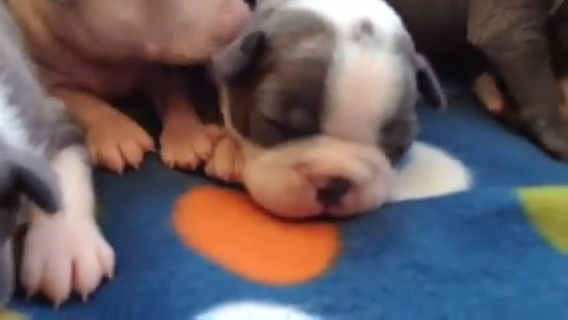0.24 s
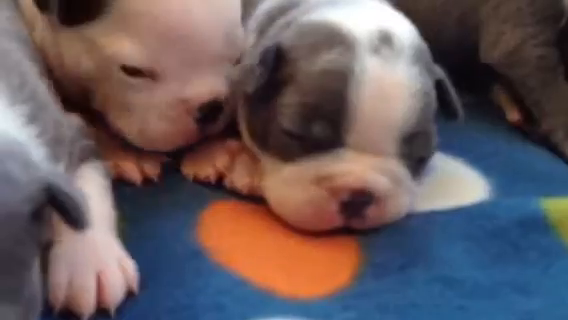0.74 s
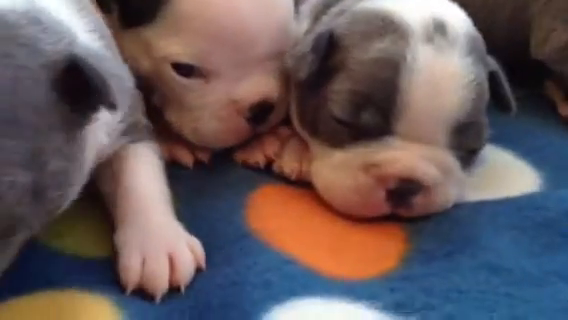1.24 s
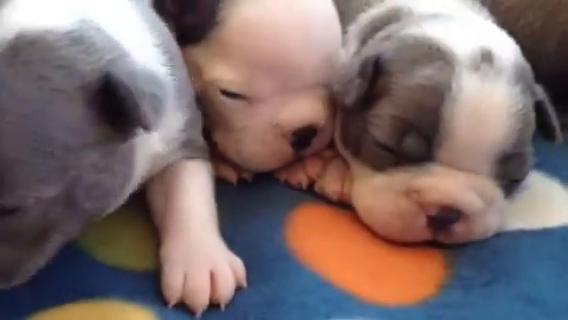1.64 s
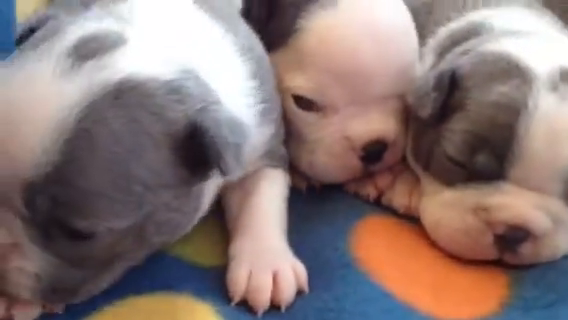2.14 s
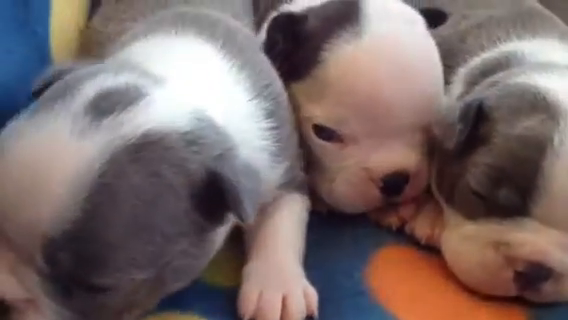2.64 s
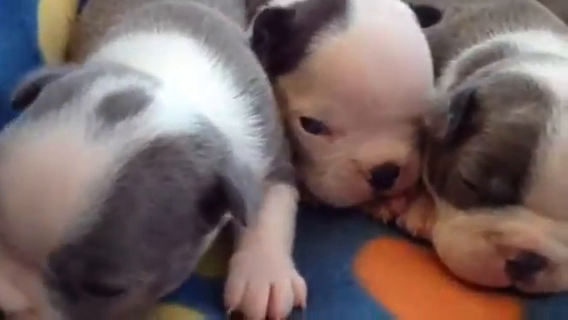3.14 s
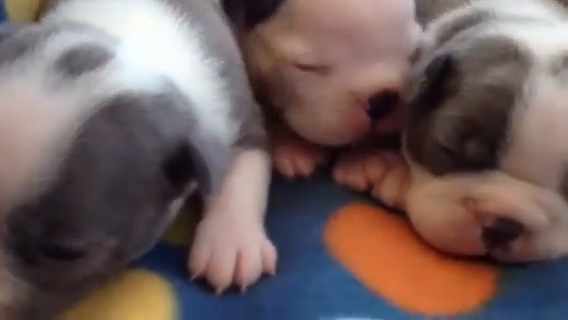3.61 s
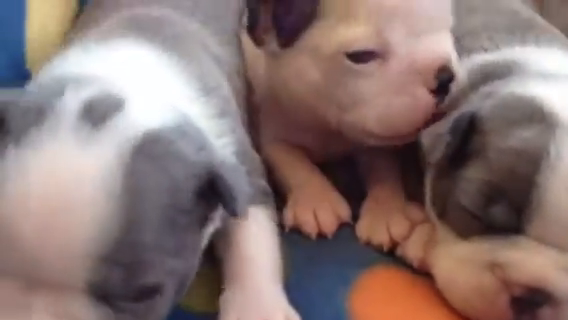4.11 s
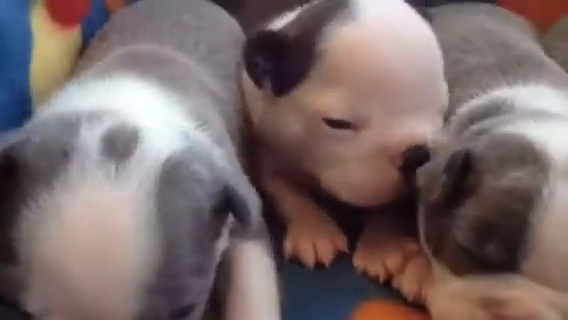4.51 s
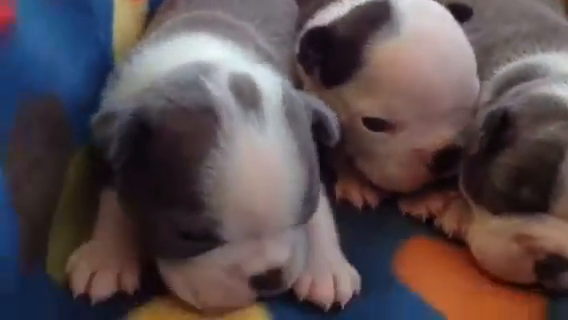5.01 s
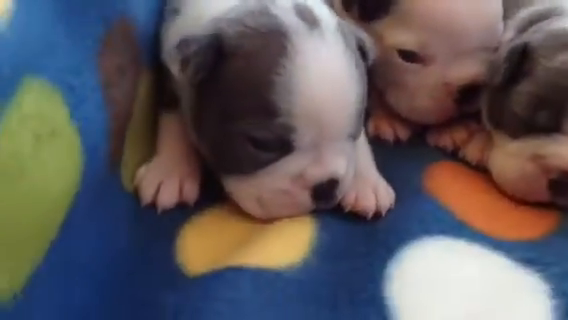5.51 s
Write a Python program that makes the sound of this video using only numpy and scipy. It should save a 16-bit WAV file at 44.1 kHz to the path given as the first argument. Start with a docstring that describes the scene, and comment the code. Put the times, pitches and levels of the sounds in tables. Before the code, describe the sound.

Quick high puppy whimpers, wavering and dropping in pitch, rise to a sharp squeal midway, above low muffled room noise.

```python
"""Dull room rumble and hiss, then a yip and a raspy grunt: a young puppy whimpers close to a small microphone.
It lies indoors on a blanket. Clear piping whines are sums of overtones; raspy cries are uneven fold pulses
ringing in the throat. Most end in a pitch drop; gasps of shaped noise follow many cries.
Short ticks (rings with a crack) come now and then, soft bumps come through the blanket (dying sines), and
faint nose whistles (gliding tones), a low undertone beneath a squeal and short wall reflections are added."""
import sys
import numpy as np
from scipy import signal
from scipy.fft import rfft, irfft, next_fast_len
from scipy.io import wavfile
from scipy.ndimage import uniform_filter1d

SR = 44100
rng = np.random.default_rng(int(sys.argv[2]) if len(sys.argv) > 2 else 0)


def to_wav(sig):
    """Store sig (one row per channel, or 1-D mono) as 16-bit WAV at the path in sys.argv[1].

    Samples outside -1..1 are clipped; the rate is SR.
    """
    pcm = np.clip(np.atleast_2d(sig), -1, 1) * 32767
    pcm = np.round(pcm).astype(np.int16)
    wavfile.write(sys.argv[1], SR, pcm.T)  # frames by channels


def makeup_ratio(level_db):
    """Linear amplitude ratio for a level in decibels (20 dB per factor of ten)."""
    decades = np.asarray(level_db, float) / 20
    return 10 ** decades


N = 254016


def evened(x):
    """Scales to rms 1."""
    return x / np.sqrt(np.mean(x ** 2) + 1e-20)


def read(points, hz):
    """Reads a spectrum on a log-frequency axis."""
    f, value = np.transpose(points)
    return np.interp(np.log(hz + 1), np.log(f + 1), value)


def add(mix, start_s, sound):
    """Mixes a sound in at start_s."""
    part = mix[round(start_s * SR):][:len(sound)]
    part += sound[:len(part)]


def colour(x, points):
    """Filters x by a spectrum."""
    size = next_fast_len(len(x) + 1024)
    gain = makeup_ratio(read(points, np.fft.rfftfreq(size, 1 / SR)))
    return irfft(rfft(x, size) * gain, size)[:len(x)]


def resonate(x, hz, width_hz):
    """Moving resonance: shifts the curve hz down to zero, smooths, and shifts back."""
    turn = np.exp(2j * np.pi * np.cumsum(hz) / SR)
    r = np.exp(-np.pi * width_hz / SR)
    return 2 * (turn * signal.lfilter([1 - r], [1, -r], x / turn)).real


# Spectral shape of the room noise. Each row: frequency in Hz, relative level in dB.
ROOM_COLOUR = [(24, -38), (40, -35), (91, -23.5), (170, 0.5), (325, -4.5), (359, -8.5), (496, -2.5),
               (817, -21), (948, -9.5), (1220, -21), (1310, -20), (1730, -23), (15500, -35.5)]


def room(level_db=-56.5, patchy_db=1.8):
    """Steady rumble and hiss: shaped noise whose spectrum drifts slightly in patches."""
    frames, hz = N // 512 + 5, np.fft.rfftfreq(2048, 1 / SR)
    a, b, patches = rng.standard_normal((frames, 1025, 3)).T
    patches = uniform_filter1d(patches, size=20, axis=0)
    patches = evened(uniform_filter1d(patches, size=8, axis=1))
    z = (a + 1j * b) * makeup_ratio(read(ROOM_COLOUR, hz)[:, None] + patchy_db * patches)
    noise = signal.istft(z, nperseg=2048, noverlap=1536)[1][:N]
    return makeup_ratio(level_db) * evened(noise)


# Throat and mouth acting on the low overtones. Each row: frequency in Hz, gain in dB.
THROAT = [(700, -8), (1130, -17.5), (1970, -3.5), (2760, -5.5), (3050, -21.5), (3700, -35.5), (4200, -43),
          (6500, -47), (8000, -40)]
# Bright band of the small microphone, for high overtones and breath. Each row: frequency in Hz,
# relative gain in dB.
BRIGHT = [(4000, -59), (5800, -26), (7000, -11), (9100, -2.5), (10500, 8), (12100, -1.5), (13100, -11),
          (15500, -4)]
# Colour of the rasp. Each row: frequency in Hz, relative gain in dB.
RASP_COLOUR = [(150, -54), (550, -16), (900, -2.5), (1400, -5), (2000, -6), (2600, -9), (2900, -14.5),
               (3300, -38), (5700, -60)]
SLIP, SLIP_FROM_OCTAVES_PER_S, START_S, SETTLE_S = .02, 19, .012, .02
EARLY_CYCLES, UNEVEN, HALVES, SWAPS_PER_S = .09, .36, .8, 70
WAVER, RASP_WAVER, RASP_FLUTTER_DB = .053, .9, 2.5
OPEN_HZ, TOP_HZ = 3450, 15350
BREATH_DB, THROAT_RING_DB, TILT_DB_PER_OVERTONE = -8, -6, 3


def cry(rows, shrill_db, start_rasp=0, pattern=2, open_db=0, rise_s=.005, fall_s=.006, edge_db=-28):
    """Steady folds give clean overtones; irregular folds give uneven pulses in the throat."""
    # Each row: time in seconds, pitch in Hz, effort in dB, overtone lift in dB, rasp from 0 to 1.
    first, last = np.array(rows[0], float), np.array(rows[-1], float)
    rows = [first + (-rise_s, 0, edge_db, 0, 0), *rows, last + (fall_s, 0, edge_db, 0, 0)]
    s, *columns = np.transpose(rows)
    t = np.arange(s[0], s[-1], 1 / SR)
    hz, effort_db, pressed_db, rasp = (uniform_filter1d(np.interp(t, s, c), size=130) for c in columns)
    hz = uniform_filter1d(hz, size=220)
    chance = rng.standard_normal((4, len(t)))

    # folds beat unevenly at the start and while the settled pitch jumps
    jump_octaves_per_s = uniform_filter1d(abs(np.gradient(np.log2(hz))) * SR, size=200)
    jump_octaves_per_s = jump_octaves_per_s * (t > first[0] + SETTLE_S)
    slip = SLIP * np.maximum(jump_octaves_per_s - SLIP_FROM_OCTAVES_PER_S, 0)
    rough = np.clip(rasp + slip + start_rasp * np.exp(-abs(t - first[0]) / START_S), 0, .9)
    clean = np.sqrt(1 - rough)
    waver = (WAVER + RASP_WAVER * rasp) * uniform_filter1d(chance[0], size=200)
    turns = np.cumsum(hz * (1 + waver)) / SR

    order = np.arange(2, 20)[:, None]
    overtone_hz = order * hz
    waves = np.cos(2 * np.pi * order * turns + order ** 2) * (overtone_hz < TOP_HZ)
    overtone_db = pressed_db - TILT_DB_PER_OVERTONE * (order - 2) + read(THROAT, overtone_hz)
    overtone_db = overtone_db + open_db * (overtone_hz > OPEN_HZ)
    low = np.cos(2 * np.pi * turns) + (clean * makeup_ratio(overtone_db) * waves).sum(0)
    high = evened((makeup_ratio(read(BRIGHT, overtone_hz)) * waves).sum(0))

    # each irregular cycle has its own strength and comes early or late; strong and weak ones
    # repeat in a short pattern that now and then skips a step
    early = EARLY_CYCLES * evened(uniform_filter1d(chance[1], size=90))
    beat = np.maximum.accumulate(np.floor(turns + early))
    swaps = np.cumsum(np.exp(-np.sum(chance[2:] ** 2, axis=0) / 2) < SWAPS_PER_S / SR)
    step = (beat + swaps) / pattern % 1
    strength = 1 + HALVES * evened(step.mean() - step) + UNEVEN * chance[3]
    pulses = np.diff(beat, prepend=beat[0]) * strength
    pulses -= uniform_filter1d(pulses, size=200)
    throat_ring = evened(resonate(resonate(pulses, hz, 510), hz, 900))
    raspy = evened(evened(colour(pulses, RASP_COLOUR)) + makeup_ratio(THROAT_RING_DB) * throat_ring)

    air = evened(colour(chance[2], BRIGHT))
    treble = clean * high + (np.sqrt(rough) + makeup_ratio(BREATH_DB)) * air
    voice = np.sqrt(2) * clean * low + np.sqrt(rough) * raspy + makeup_ratio(shrill_db) * treble
    flutter = evened(uniform_filter1d(uniform_filter1d(chance[3], size=150), size=150))
    return s[0], -makeup_ratio(effort_db + RASP_FLUTTER_DB * rasp * flutter) * voice


# Yips just before a cry. Each row: start in seconds, length in seconds, pitch in Hz, final effort in dB,
# treble against the effort in dB.
YIPS = [(0.051, 0.004, 1286, -39.5, -22), (1.397, 0.0077, 1388, -40, -50), (1.864, 0.019, 1143, -40, -55),
        (2.994, 0.01, 1197, -47.5, -45), (4.428, 0.0023, 1446, -39, -26), (4.834, 0.0023, 1200, -41.5, -35)]
YIP_LIFT_DB, YIP_RASP = -1, .55


def yip(s, length_s, hz, db, shrill_db):
    """A false start of the voice: effort and rasp rise at one pitch."""
    start = (s, hz, db - 7, YIP_LIFT_DB, YIP_RASP / 2)
    end = (s + length_s, hz, db, YIP_LIFT_DB, YIP_RASP)
    return cry([start, end], shrill_db)


def walls(x, level_db=-31, t60_s=0.12):
    """A short soft tail of sparse reflections with random signs."""
    taps = np.zeros(SR // 4)
    at = np.arange(100, len(taps) - 20, 20) + rng.integers(0, 20, (len(taps) - 101) // 20)
    taps[at] = rng.choice([-1., 1.], len(at)) * makeup_ratio(-60 * at / SR / t60_s)
    return makeup_ratio(level_db) * signal.fftconvolve(x, taps / np.linalg.norm(taps))[:N]


# Raspy grunts. Each row: start in seconds, length in seconds, start pitch in Hz, end pitch in Hz,
# catch pitch in Hz, effort in dB, last catch against the effort in dB, throb depth in dB.
GRUNTS = [(0.072, 0.036, 1154, 986, 848, -42, 8, 3.5), (0.417, 0.042, 1480, 1091, 885, -37, 3, -4),
          (2.245, 0.063, 1098, 806, 833, -43.5, 5.5, 3), (2.592, .054, 1053, 992, 934, -52.5, -1.5, 9),
          (3.006, 0.061, 1073, 1045, 920, -43, -9, 0.5)]
# Each value, one a grunt: fold cycles in one strong-weak pattern.
GRUNT_PATTERN = [3, 2, 2, 2.5, 4.5]
SAG_BEND, THROB_HZ, GRUNT_RASP, GRUNT_CATCH_S = .8, 81.7, .73, .008
GRUNT_LIFT_DB, STALL_DB = -3, -6
TREBLE_AT_1_KHZ_DB, TREBLE_DB_PER_OCTAVE = -38, 32  # higher grunts are brighter
# shared with the whines: overtone and effort changes at the catch
BREAK_DULL_DB, CATCH_DULL_DB, CATCH_FADE_DB = -1, -9.5, -5


def grunt(s, length_s, start_hz, end_hz, catch_hz, db, catch_db, throb_db, pattern):
    """A clear start turns to rasp that sags, throbs and stalls, then a dull catch; a weak catch trails off."""
    end = s + length_s
    rows = [(s + (length_s - GRUNT_CATCH_S) * u, start_hz + (end_hz - start_hz) * u ** SAG_BEND,
             db, GRUNT_LIFT_DB, GRUNT_RASP * (u > 0))
            for u in np.linspace(0, 1, num=9)]
    rows += [(end - GRUNT_CATCH_S / 2, end_hz, db + STALL_DB, GRUNT_LIFT_DB, GRUNT_RASP),
             (end + 0.0022, catch_hz, db + catch_db, GRUNT_LIFT_DB + BREAK_DULL_DB, YIP_RASP / 2),
             (end + GRUNT_CATCH_S, catch_hz, db + catch_db + CATCH_FADE_DB,
              GRUNT_LIFT_DB + CATCH_DULL_DB, 0)]
    shrill_db = TREBLE_AT_1_KHZ_DB + TREBLE_DB_PER_OCTAVE * np.log2(start_hz / 1000)
    fall_s = .018 if catch_db < 0 else .006
    start, voice = cry(rows, shrill_db, pattern=pattern, fall_s=fall_s)
    t = np.arange(len(voice)) / SR + start - s
    throb = 1.22 - np.sin(np.pi * THROB_HZ * (t + 0.002) + np.pi / 2) ** 4
    return start, voice * makeup_ratio(throb_db * throb)


# Gasps after the cries. Each row: start in seconds, length in seconds, rms level before edge fades in dB.
GASPS = [(0.105, 0.078, -56.5), (0.467, 0.036, -58.5), (0.872, 0.036, -60), (1.238, 0.025, -60),
         (1.648, 0.042, -57), (2.011, 0.032, -58.5), (2.303, 0.061, -62.5), (3.654, 0.034, -64),
         (4.266, 0.031, -61), (4.675, 0.03, -59.5), (5.087, 0.026, -57.5), (5.453, 0.071, -62)]
# Each row: frequency in Hz, relative gain in dB.
GASP_COLOUR = [(800, 9.5), (2000, 11.5), (4500, 6.5), (6000, -1), (10500, 6.5), (15000, 5.5)]


def gasp(length_s):
    """A puff of air: coloured noise with faded edges."""
    count = round(length_s * SR)
    return evened(colour(rng.standard_normal(count), GASP_COLOUR)) * signal.windows.tukey(count, .6)


# Short ticks of lips and claws; the final row is the sharp onset of the last cry's catch.
# Each row: start in seconds, ring level in dB, ring frequency in Hz.
TICKS = [(0.229, -42.5, 900), (1.022, -52.5, 1560), (2.017, -45, 1010), (2.422, -43.5, 1070),
         (3.438, -43.5, 1730), (3.978, -35.5, 4150), (4.801, -38.5, 896), (5.448, -32, 1350)]


def tick(hz, cycles=25, crack=0.75):
    """A sharp noise crack with a very short ring that falls 60 dB in the given cycles."""
    t = np.arange(800) / SR
    ring = np.sin(2 * np.pi * hz * t) * makeup_ratio(-60 * t * hz / cycles)
    noise = uniform_filter1d(rng.standard_normal(len(t)), size=13)
    return ring + crack * noise * makeup_ratio(-60 * t / 0.043)


# One curve a stretch of voice; the yelp and the last raspy cry take two each.
# Each row: time in seconds, pitch in Hz, effort in dB.
WHINES = [
    [(0.722, 1795, -33.5), (0.729, 1530, -38), (.744, 1368, -37), (0.76, 1312, -36.5), (0.802, 1422, -34),
     (0.826, 1326, -32), (0.857, 1340, -36.5)],
    [(1.072, 1880, -35.5), (1.101, 2141, -36.5), (1.106, 1842, -33.5), (1.121, 1862, -34),
     (1.141, 1744, -33.5), (1.177, 1614, -39.5), (1.189, 1566, -34), (1.215, 1439, -38.5)],
    [(1.428, 1494, -40.5), (1.462, 1422, -40.5), (1.486, 1346, -40), (1.504, 1190, -49), (1.518, 1157, -38),
     (1.54, 1110, -38), (1.566, 1134, -39), (1.61, 1051, -36.5), (1.634, 1018, -37.5)],
    [(1.886, 1090, -37), (1.898, 1021, -38), (1.91, 999, -35.5), (1.944, 1083, -39.5), (1.974, 963, -32.5),
     (1.993, 900, -34.5)],
    [(3.52, 2000, -57), (3.526, 1587, -50.5), (3.561, 1520, -52), (3.595, 1271, -49.5),
     (3.621, 1090, -50.5), (3.633, 936, -48.5), (3.645, 760, -49)],
    [(3.824, 2720, -45), (3.828, 2780, -23), (3.833, 2404, -38.5), (3.842, 2250, -26), (3.856, 2113, -30),
     (3.862, 1918, -23), (3.878, 2095, -27.5), (3.897, 2094, -28.5), (3.911, 1846, -22.5)],
    [(3.918, 1430, -40), (3.932, 1435, -41.5), (3.96, 1570, -36), (3.972, 1607, -49.5),
     (4.012, 1564, -63.5)],
    [(4.112, 2510, -43), (4.123, 2110, -34), (4.151, 2247, -32), (4.173, 2025, -29), (4.191, 1830, -30),
     (4.207, 1830, -28), (4.235, 1829, -30.5), (4.246, 1730, -34.5), (4.257, 1512, -27),
     (4.264, 1420, -39.5)],
    [(4.441, 1588, -41.5), (4.469, 1798, -42), (4.489, 1854, -37), (4.511, 1868, -35.5),
     (4.563, 1670, -40.5), (4.591, 1585, -37.5), (4.625, 1567, -38), (4.641, 1492, -36.5),
     (4.657, 1302, -35), (4.664, 1307, -30.5)],
    [(4.861, 1317, -42), (4.891, 1368, -43), (4.911, 1291, -41), (4.947, 1188, -34.5), (5.021, 1104, -35),
     (5.047, 1031, -37), (5.068, 1031, -36.5)],
    [(5.304, 1152, -44), (5.323, 1056, -46), (5.395, 1125, -44), (5.411, 957, -44)],
    [(5.42, 916, -45), (5.43, 888, -42.5), (5.443, 822, -52)],
]
# Each row, one a curve: overtone lift in dB, treble against the effort in dB, pitch drop at the break
# from 0 to 1, share of the drop won back, catch against the effort in dB.
WHINE_VOICES = [(2, -16, .19, 0.07, 7), (3.5, -21, 0.22, 0.2, 4.5), (0.5, -26.5, .19, 0.8, 5.5),
                (-5, -38, 0.2, 1, -2), (10.5, -33, 0.2, 0.2, 3), (2.5, -19, 0.01, 0, 0),
                (15.5, -18.5, 0.03, 0, 0), (-2, -18, 0.03, 0, 0), (-2, -16.5, 0.06, 0.83, -7.5),
                (-4.5, -25, .21, 0.9, 1), (-2, -32, 0.03, 0, 0), (2.5, -38, .15, 1.5, 13.5)]
# Share of irregular fold cycles. Each row, one a curve: at the start, in the glide, at the break, all 0 to 1.
WHINE_RASP = [(.03, 0, .1), (0, 0, .1), (.5, .004, .1), (.4, .002, .1), (.4, .01, .65), (0, .002, 0),
              (.3, .03, 0), (.05, .001, 0), (.1, 0, .05), (.25, .002, .1), (0, .7, 0), (.5, .15, .2)]
# Open mouth. Each value, one a curve: lift of the low overtones above OPEN_HZ in dB.
WHINE_OPEN = [-1, -4, 1, -3, 14, -3, 1, 3.5, 6.5, 2, 2, 8]
# share of a dip in effort that the overtones do not follow; deeper dips take them along
OVERTONE_HOLD, HOLD_LIMIT_DB = .5, 8
BREAK_S, CATCH_S, NO_BREAK_DROP = .008, .0099, .02


def whine(curve, rasp, open_db, lift_db, shrill_db, drop, regain, catch_db):
    """A glide of the voice; where the drop is large, it ends in a pitch fall and a dulling catch."""
    start_rasp, glide_rasp, break_rasp = rasp
    top_db = max(db for _, _, db in curve)
    rows = [(s, hz, db, lift_db + OVERTONE_HOLD * min(top_db - db, HOLD_LIMIT_DB), glide_rasp)
            for s, hz, db in curve]
    s, hz, db = curve[-1]
    if drop > NO_BREAK_DROP:
        break_end = s + BREAK_S
        rows += [(break_end, hz * (1 - drop), db + catch_db, lift_db + BREAK_DULL_DB, break_rasp),
                 (break_end + CATCH_S, hz * (1 - drop * (1 - regain)), db + catch_db + CATCH_FADE_DB,
                  lift_db + CATCH_DULL_DB, break_rasp / 2)]
    return cry(rows, shrill_db, start_rasp, open_db=open_db)


# Faint nose whistles. Each row: start in seconds, length in seconds, start pitch in Hz, top pitch in Hz,
# end pitch in Hz, peak level in dB.
WHISTLES = [(0.937, 0.05, 9160, 9530, 9370, -64), (4.723, 0.077, 10700, 11100, 9640, -67)]


def whistle(length_s, *arch_hz):
    """Air through a narrow nostril: one thin arching tone."""
    count = round(length_s * SR)
    hz = np.interp(np.linspace(0, 2, count), np.arange(3), arch_hz)
    hz = uniform_filter1d(hz, size=400)
    return np.sin(2 * np.pi * np.cumsum(hz) / SR) * signal.windows.tukey(count, .5)


# Undertone of the squeal. Each row: time in seconds, pitch in Hz, rms level of its fundamental in dB.
UNDERTONE = [(3.865, 542, -50.5), (3.927, 615, -60.5), (3.972, 507, -49)]


def undertone():
    """A faint low undertone beneath the squeal: a wavering tone with two weaker overtones."""
    s, hz, db = np.transpose(UNDERTONE)
    t = np.arange(s[0], s[-1], 1 / SR)
    waver = 0.25 * uniform_filter1d(rng.standard_normal(len(t)), size=100)
    phase = 2 * np.pi * np.cumsum(np.interp(t, s, hz) * (1 + waver)) / SR
    voice = np.cos(phase) + 0.43 * np.cos(2 * phase) + 0.33 * np.cos(3 * phase)
    return s[0], np.sqrt(2) * makeup_ratio(np.interp(t, s, db)) * voice * signal.windows.tukey(len(t), .2)


# Soft bumps through the blanket. Each row: start in seconds, level before decay in dB, frequency in Hz.
BUMPS = [(4.078, -36, 155), (4.804, -29, 334)]


def bump(hz, cycles=5.8):
    """A padded push: a sine that dies within a few cycles."""
    turns = np.arange(4000) / SR * hz
    return np.sin(2 * np.pi * turns) * makeup_ratio(-60 * turns / cycles) * np.minimum(2 * turns, 1)


def scene():
    """The puppy's voice and small sounds, with wall reflections, over the room noise."""
    puppy = np.zeros(N)
    for row in YIPS:
        add(puppy, *yip(*row))
    for row, pattern in zip(GRUNTS, GRUNT_PATTERN):
        add(puppy, *grunt(*row, pattern))
    for s, length_s, db in GASPS:
        add(puppy, s, makeup_ratio(db) * gasp(length_s))
    for s, db, hz in TICKS:
        add(puppy, s, makeup_ratio(db) * tick(hz))
    for curve, rasp, open_db, voice in zip(WHINES, WHINE_RASP, WHINE_OPEN, WHINE_VOICES):
        add(puppy, *whine(curve, rasp, open_db, *voice))
    for s, length_s, *arch_hz, db in WHISTLES:
        add(puppy, s, makeup_ratio(db) * whistle(length_s, *arch_hz))
    add(puppy, *undertone())
    for s, db, hz in BUMPS:
        add(puppy, s, makeup_ratio(db) * bump(hz))
    puppy = signal.sosfilt(signal.butter(3, 90, "high", fs=SR, output="sos"), puppy)
    return (puppy + walls(puppy) + room())[None]


def top_cut(x):
    """Nothing passes above the cut-off."""
    return signal.sosfilt(signal.butter(12, 15400, fs=SR, output="sos"), x)


def record(dry):
    """Limits the band with a steep linear-phase low-pass and finishes the mix."""
    low_pass = signal.firwin(numtaps=511, cutoff=15400, window=("kaiser", 9), fs=SR)
    mix = signal.oaconvolve(dry, low_pass[None], "same")
    return top_cut(mix)


dry = scene()
out = record(dry)
to_wav(out)
```